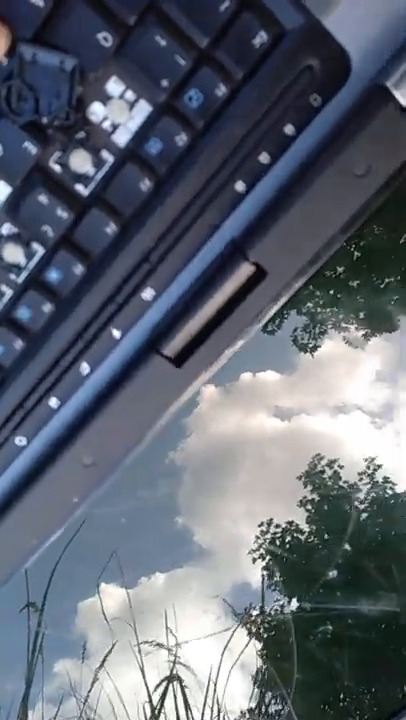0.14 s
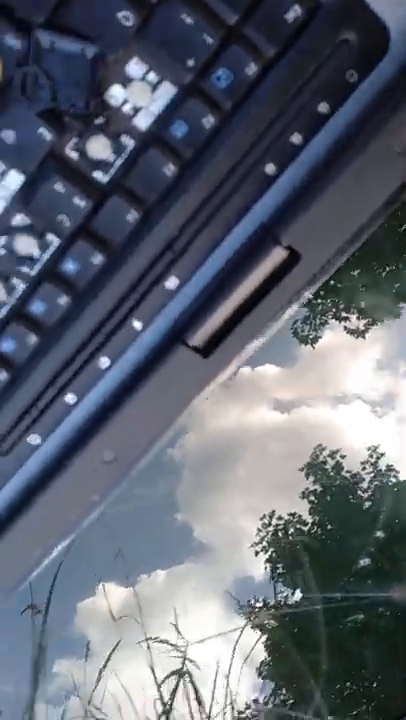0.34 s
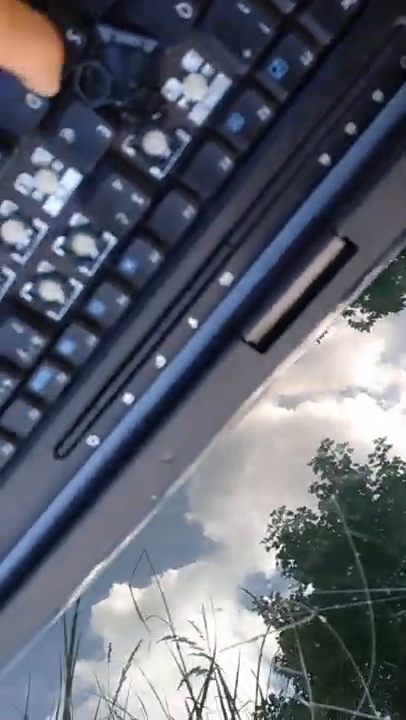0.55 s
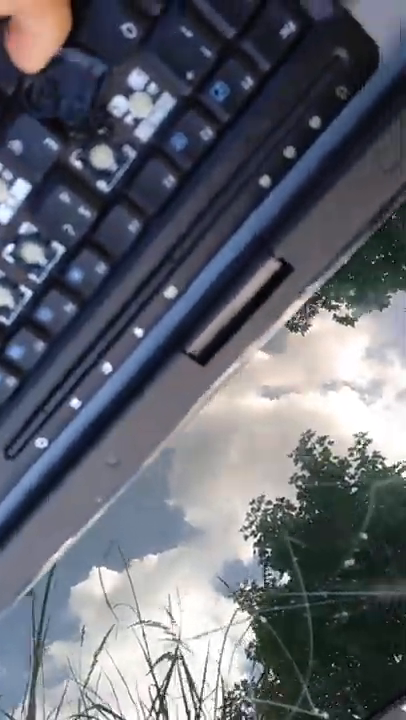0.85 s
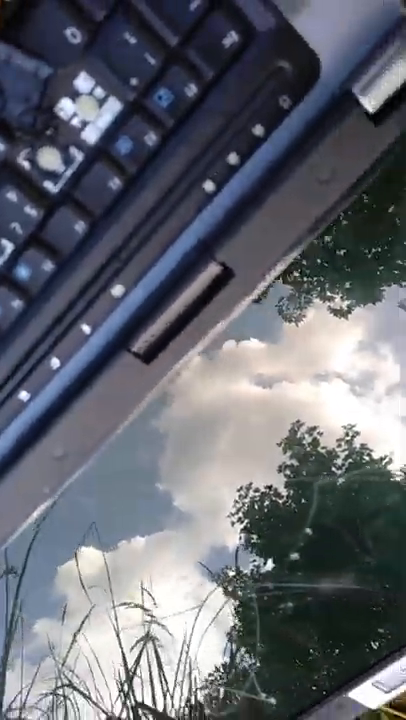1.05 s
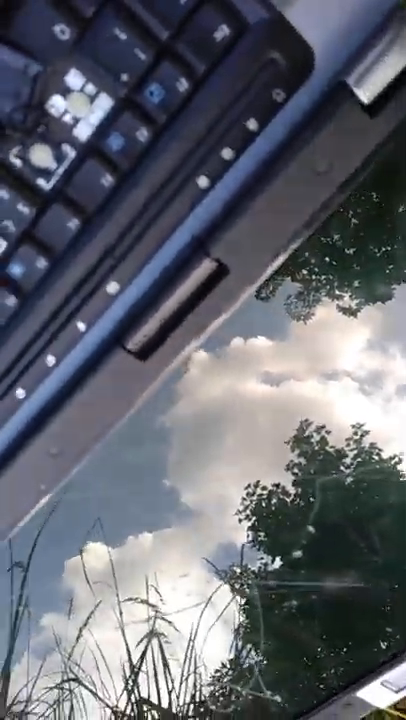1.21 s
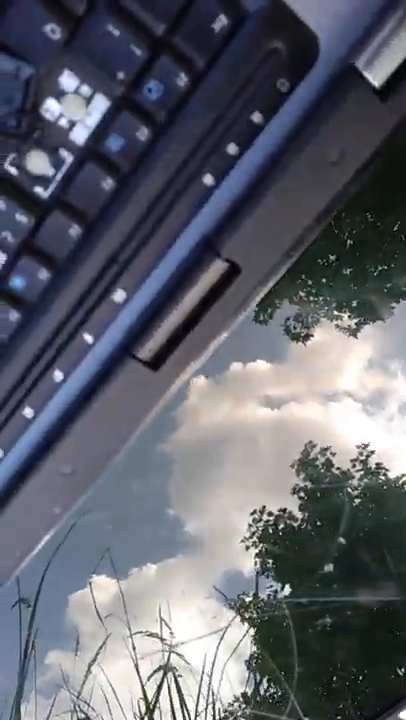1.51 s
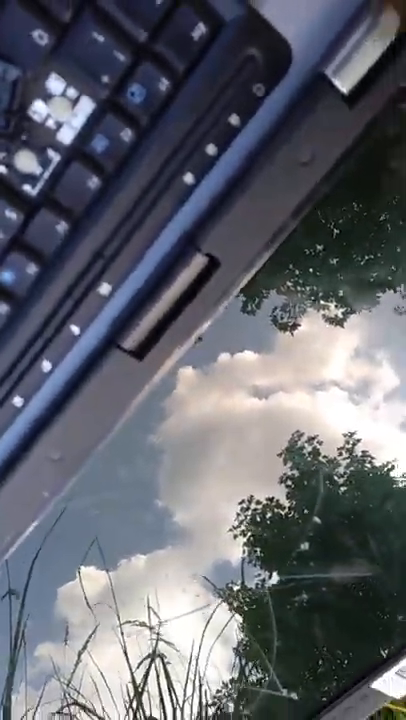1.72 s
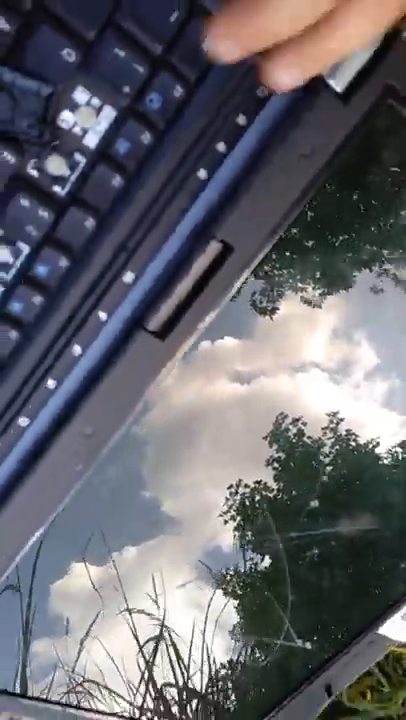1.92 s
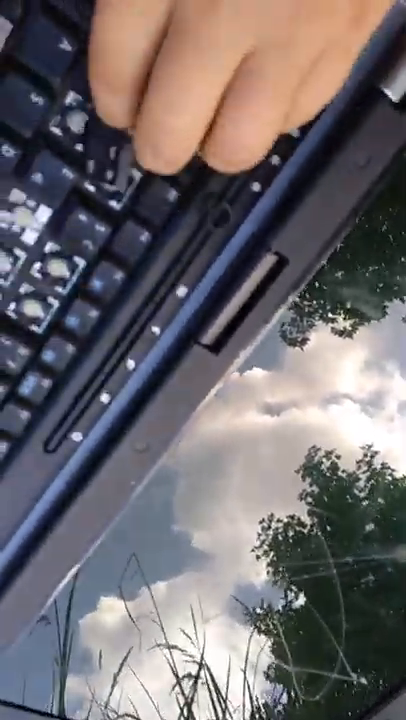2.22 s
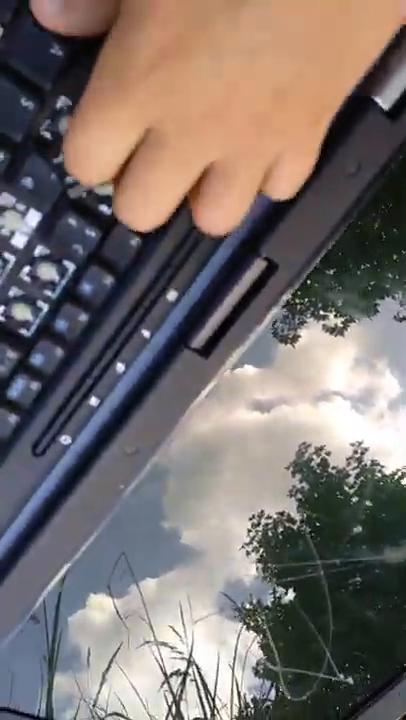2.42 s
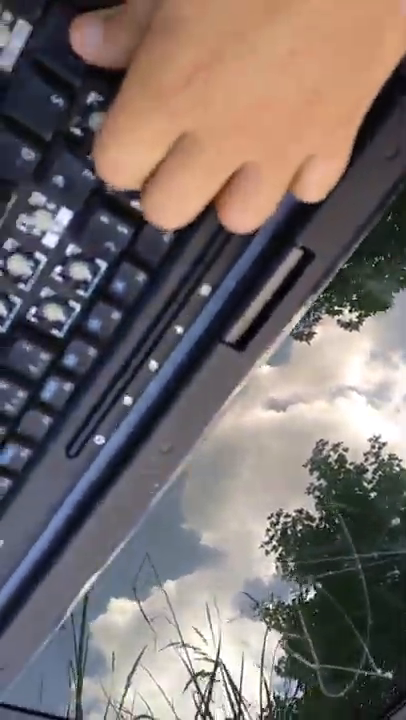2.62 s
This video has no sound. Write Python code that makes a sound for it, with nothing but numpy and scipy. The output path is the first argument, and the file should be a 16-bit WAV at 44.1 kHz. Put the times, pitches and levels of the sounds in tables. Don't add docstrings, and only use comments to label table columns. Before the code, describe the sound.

Plastic keycaps pried off a laptop keyboard, sharp irregular snaps and clicks, very close, outdoors

```python
import sys
import numpy as np
from scipy import signal
from scipy.fft import rfft, irfft, next_fast_len
from scipy.io import wavfile
from scipy.ndimage import uniform_filter1d, minimum_filter1d, map_coordinates

SR = 44100
rng = np.random.default_rng(int(sys.argv[2]) if len(sys.argv) > 2 else 0)


def gain_from_db(level_db):
    decades = np.asarray(level_db, float) / 20
    return 10 ** decades


def file_out(sig):
    cols = np.atleast_2d(sig).T
    lim = np.clip(cols, -1, 1)
    pcm = np.round(lim * 32767).astype(np.int16)
    wavfile.write(sys.argv[1], SR, pcm)


N = 121275
CLICK_T = np.arange(2048) / SR


def unit(x):
    return x / np.sqrt(np.mean(x ** 2, axis=-1, keepdims=True) + 1e-20)


def peak(x):
    return x / np.abs(x).max(axis=-1, keepdims=True)


def along(points, hz):
    f, v = np.transpose(points)
    return np.interp(np.log(hz + 1), np.log(f + 1), v)


def filtered(x, response):
    n = x.shape[-1]
    m = next_fast_len(n + 4096)
    return irfft(rfft(x, m) * response(np.fft.rfftfreq(m, 1 / SR)), m)[..., :n]


def high_pass(f, hz):
    return 1j * f / (hz + 1j * f)


def resonant(peaks):
    def response(f):
        total = 0
        for k, (centre, width, db) in enumerate(peaks):
            damping = 1j * f * width
            total = total + (-1) ** k * gain_from_db(db) * damping / (centre * centre - f * f + damping)
        return total
    return response


def ringing(modes, count, t):
    draw = rng.standard_normal((count, len(modes), 2))
    hz, db, t60 = np.transpose(modes)[..., None]
    decay = gain_from_db(db + 2.85 * draw[..., :1] - 60 * t / t60)
    tone = np.sin(2 * np.pi * hz * t * (1 + 0.0031 * draw[..., 1:]))
    return (decay * tone).sum(axis=1)


def wobble(rate):
    return map_coordinates(rng.standard_normal(int(N * rate / SR) + 4), [np.arange(N) * rate / SR])


def placed(times, rows):
    at = np.round(times * SR).astype(int)[:, None] + np.arange(rows.shape[1])
    return np.bincount(at.ravel(), rows.ravel(), N + SR)[:N]


def slips(count, t):
    slip_t60_s, rebound_s = .0095, .002
    rattle_db, rattle_t60_s = -25, 0.055
    back = rebound_s * (.5 + rng.random((count, 1)))

    def fall(u):
        return (u >= 0) * gain_from_db(-60 * np.abs(u) / slip_t60_s)

    noise = rng.standard_normal((count, len(t)))
    spiky = noise * np.sqrt(np.abs(noise))
    rattle = gain_from_db(rattle_db - 60 * t / rattle_t60_s)
    return spiky * (fall(t) + 0.44 * fall(t - back) + rattle) + 6 * (t == 0)


# (frequency [Hz], level [dB])
BRIGHT_COLOUR = [(3000, -6), (5000, -2), (7000, -1), (10000, 8.5), (13500, -1.5), (15800, -2.5)]
SNAP_LOW_HZ, TICK_LOW_HZ, FAINT_LOW_HZ = 2640, 5400, 5500


def clip_ring(count, t, low_hz=SNAP_LOW_HZ):
    clip_t60_s, modes = .004, 20
    draw = rng.random((count, modes, 3))
    hz = 4000 + 12200 * draw[..., :1]
    t60 = clip_t60_s * (.5 + draw[..., 2:])
    short = t[:512]
    decay = gain_from_db(along(BRIGHT_COLOUR, hz) + 10 * draw[..., 1:2] - 60 * short / t60)
    ring = (decay * np.sin(2 * np.pi * hz * short)).sum(axis=1)
    struck = signal.fftconvolve(slips(count, t), ring, axes=1)[:, :len(t)]
    return peak(filtered(struck, lambda f: high_pass(f, low_hz) ** 2))


# (frequency [Hz], width [Hz], level [dB])
CAP_TONES = [(1896, 680, -4), (2465, 440, 1.5), (3000, 1300, -5)]


def cap_tone(jolt):
    return peak(filtered(jolt, lambda f: resonant(CAP_TONES)(f) ** 2))


# (frequency [Hz], width [Hz], level [dB])
CASE_TONES = [(160, 750, -12.5), (450, 130, -.5), (745, 140, 0), (1134, 680, -5.5)]


def case_knock(jolt):
    return peak(filtered(jolt, lambda f: resonant(CASE_TONES)(f) * high_pass(f, 200) / (1 + 1j * f / 1500)))


# (time [s], peak level [dB], cap tone [dB], case knock [dB])
EARLY_SNAPS = [(0.5164, -27, -17, -3), (0.556, -21, -21, -20), (0.5636, -24, -16, -2),
               (0.679, -12.5, -18.5, -43), (0.9103, -30, -12, 1.5), (1.0272, -2, -39, -12.5),
               (1.0568, 0, -29, -23.5), (1.1837, -6, -29, -41), (1.2326, -6.5, -35, -26),
               (1.2492, -7, -41, -29), (1.2585, -10.5, -28, -17), (1.3817, -17, -18, -6),
               (1.3868, -9.5, -17, -12.5), (1.4919, -13, -21, -43), (1.5755, -17.5, -20, -8.5),
               (1.6227, -12, -23, -46), (1.6558, -18.5, -17.5, 1.5), (1.9693, -10, -24, -22),
               (1.9765, -12, -15, -9.5), (2.0053, -5.5, -31, -53), (2.011, -9.5, -31, -16)]
LATE_SNAPS = [(2.0357, 0, -31, -19), (2.0439, -2, -25, -36), (2.1157, -15.5, -25, -27),
              (2.1501, -19, -23, -6), (2.2268, 3.5, -22, -4.5), (2.2338, 1.5, -15, -26),
              (2.243, -22, -18, -25), (2.3776, -20.5, -6, 5), (2.4353, -12, -18, -11),
              (2.4976, 1.5, -30, -9), (2.591, -10.5, -9, -21), (2.5965, 3, -15.5, -8),
              (2.6609, -2.5, -38, -33), (2.7194, -6, -39, -0.5)]
# (time [s], peak level [dB])
EARLY_TICKS = [(0.021, -25.5), (0.0386, -26.5), (0.5014, -23), (0.7374, -26.5), (0.8114, -20.5),
               (1.022, -11), (1.05, -5), (1.1185, -29), (1.2652, -11.5), (1.2721, -20), (1.3289, -21.5),
               (1.41, -17), (1.4198, -13), (1.429, -11.5), (1.4563, -20), (1.5814, -10.5), (1.597, -28),
               (1.639, -44), (1.675, -19), (1.694, -18), (1.8118, -12.5), (1.8387, -13)]
LATE_TICKS = [(2.0399, -33), (2.042, -2.5), (2.0531, -5), (2.2868, -12), (2.2942, -5), (2.317, -7.5),
              (2.3291, -8), (2.3353, -8), (2.3461, -1.5), (2.3519, -2), (2.362, -27), (2.386, -5),
              (2.4062, -11), (2.4605, -20), (2.4837, -8), (2.492, -0.5), (2.5024, -3), (2.527, -18),
              (2.6505, -22), (2.6556, -17), (2.6904, -6)]
# (time [s], peak level [dB])
LEAD_SLIP = [
    (1.857, -16),
]


def snaps():
    snap_db, cap_gain_db, case_gain_db = -1, 2, -14.5
    tick_cap_db, tick_case_db = -28.5, -21
    full = EARLY_SNAPS + LATE_SNAPS
    ticks = [(s, db, tick_cap_db, tick_case_db) for s, db in EARLY_TICKS + LATE_TICKS + LEAD_SLIP]
    s, db, cap_db, case_db = np.transpose(full + ticks)[..., None]
    count = len(s)
    jolt = slips(count, CLICK_T)
    low_hz = np.where(np.arange(count) < len(full), SNAP_LOW_HZ, TICK_LOW_HZ)[:, None]
    sound = clip_ring(count, CLICK_T, low_hz)
    sound = sound + gain_from_db(cap_db + cap_gain_db) * cap_tone(jolt)
    sound = sound + gain_from_db(case_db + case_gain_db) * case_knock(jolt)
    return placed(s[:, 0], gain_from_db(db + snap_db) * sound)


# (time [s], peak level [dB], air push [dB])
FREE_POPS = [
    (0.1573, 0.5, -70),
    (0.2939, -2.5, -2),
    (1.512, -6, -55),
    (1.757, -4.5, -19.5),
    (1.8705, 1.5, -14),
]
# (frequency [Hz], level [dB], t60 [s])
FREE_CAP_MODES = [(4600, 30, 0.0007), (6680, 2.5, 0.0087), (9570, 18, 0.0046), (10200, -6.5, 0.01),
                  (11830, 7, 0.0049), (14000, 20, 0.0078)]


def pops():
    push_s = .00009
    s, db, push_db = np.transpose(FREE_POPS)[..., None]
    t, count = CLICK_T, len(s)
    push = np.exp(-((t - 3 * push_s) / push_s) ** 2)
    puff = rng.standard_normal((count, len(t))) * gain_from_db(-60 * t / 0.043)
    spray = .2 * clip_ring(count, t) + 0.052 * gain_from_db(push_db) * puff
    blow = peak(filtered(ringing(FREE_CAP_MODES, count, t), lambda f: high_pass(f, 3200) ** 4))
    return placed(s[:, 0], gain_from_db(db) * (blow + gain_from_db(push_db) * push + spray))


# (time [s], peak level [dB])
HOOK_BLOWS = [(0.7888, -25.5), (1.1284, -23), (1.1475, -29), (1.162, -4), (1.1964, -17.5), (1.2142, -7.5),
              (1.294, -43), (1.437, -20), (1.4493, -19.5), (1.4822, -23), (1.5529, -40), (1.6112, -12.5),
              (1.6644, -21), (2.307, -23), (2.5436, -17), (2.5872, 0)]
# (frequency [Hz], level [dB], t60 [s])
STEEL_MODES = [(5160, -20, .015), (6720, 0, .028), (8300, -15, .02), (13700, -2, .018)]
# (time [s], peak level [dB])
WIRE_BLOWS = [
    (2.2661, -14),
    (2.5587, -10.5),
    (2.5639, -10.5),
]
# (frequency [Hz], level [dB], t60 [s])
WIRE_MODES = [(8530, 17, 0.031), (11900, -25, .01)]


def hooks(hits, modes):
    hook_db, steel_share, cap_share = -3.5, .6, 0.039
    s, db = np.transpose(hits)[..., None]
    t, count = CLICK_T, len(s)
    sung = signal.fftconvolve(slips(count, t), ringing(modes, count, t), axes=1)
    steel = peak(sung[:, :len(t)])
    cap = cap_tone(slips(count, t))
    return placed(s[:, 0], gain_from_db(db + hook_db) * (steel_share * steel + clip_ring(count, t) + cap_share * cap))


# (time [s], peak level [dB])
SMALL_TICKS = [(0.076, -41), (0.0897, -40), (0.1431, -42), (0.3584, -31), (0.386, -33), (0.423, -39),
               (0.4476, -30), (0.457, -30), (0.536, -31), (0.646, -28), (0.6658, -22), (0.783, -23),
               (1.308, -28), (1.334, -26), (1.96, -25), (1.991, -19), (2.025, -40), (2.06, -32),
               (2.208, -23), (2.298, -15.5), (2.3385, -7), (2.37, -12)]
# (time [s], peak level [dB], frequency [Hz], t60 [s])
PART_RINGS = [(0.0897, -32.5, 6500, 0.0087), (0.1584, -11.5, 5540, 0.0053), (0.294, -4, 5200, 0.0052),
              (0.2941, -2, 11950, 0.0045), (0.409, -44.5, 770, 0.038), (0.493, -47, 3500, .01),
              (0.564, -27.5, 5040, 0.011), (0.568, -37, 778, 0.054), (0.91, -39.5, 2350, 0.033),
              (0.9103, -30.5, 5330, 0.016), (1.121, -27.5, 8900, 0.013), (1.185, -26, 5170, 0.026),
              (1.296, -29.5, 7240, 0.028), (1.7552, -9.5, 7700, 0.0049), (1.925, -43, 394, 0.037),
              (1.945, -42, 324, 0.037), (1.9695, -22.5, 3800, 0.014), (1.977, -24, 3450, 0.036),
              (1.977, -30, 1930, 0.052), (1.977, -14.5, 9400, 0.0085), (2.007, -23, 2910, 0.016),
              (2.0528, -6.5, 8950, 0.013), (2.151, -32.5, 980, .03), (2.187, -31, 3240, 0.0088),
              (2.317, -30, 8300, .04), (2.323, -28, 6720, .04), (2.34, -25.5, 3280, 0.016),
              (2.435, -28, 2950, 0.014), (2.497, -14.5, 2830, 0.016), (2.598, -25, 443, 0.056),
              (1.026, -10, 6300, 0.01), (1.058, -45, 114, 0.037), (1.412, -19, 14000, 0.029),
              (1.622, -29, 6900, 0.028), (1.663, -25, 13700, .02), (1.84, -42, 1020, 0.059),
              (2.035, -42, 90, 0.056), (2.042, -33, 6750, 0.053), (2.205, -47, 376, 0.021),
              (2.345, -29, 6700, 0.033), (2.469, -20, 7300, 0.014), (2.528, -29, 6720, 0.032)]


def small_parts():
    rise_s = 0.00034
    t = CLICK_T
    s, db = np.transpose(SMALL_TICKS)[..., None]
    ticks = clip_ring(len(s), t, FAINT_LOW_HZ)
    at, ring_db, hz, t60 = np.transpose(PART_RINGS)[..., None]
    shiver = np.cumsum(rng.standard_normal((len(at), len(t))), axis=1) * 0.038
    swell = gain_from_db(ring_db - 60 * t / t60) * (1 - np.exp(-t / rise_s))
    rings = swell * np.sin(2 * np.pi * hz * t + shiver)
    return placed(s[:, 0], gain_from_db(db) * ticks) + placed(at[:, 0], rings)


def grit():
    grains_per_s, spread_db, hiss_share = 3000, 3.2, 1.1
    size_db = np.minimum(spread_db * rng.exponential(size=N), 13)
    ticks = (rng.random(N) < grains_per_s / SR) * gain_from_db(size_db) * rng.uniform(-1.04, 1, N)
    return unit(ticks) + hiss_share * rng.standard_normal(N)


# (start [s], length [s], level [dB], dullness [dB])
NAIL_STROKES = [(0.293, 0.22, -54, -1.5), (0.533, 0.2, -40.5, 3), (0.604, 0.054, -36, 0.5),
                (1.13, 0.18, -56.5, 10.5), (1.269, 0.056, -45.5, 1.5), (1.323, 0.021, -40, -14),
                (1.965, 0.13, -51, 14), (1.367, 0.074, -36, -9), (1.469, 0.059, -36.5, -21),
                (1.542, 0.19, -46, -33), (1.926, 0.028, -57.5, 15), (2.07, 0.12, -38, -9.5),
                (2.221, 0.043, -24, 3.5), (2.236, 0.29, -41.5, -0.5), (2.451, 0.096, -33.5, 2),
                (2.576, 0.05, -19, 0), (2.593, 0.13, -46, 4.5)]
# (time [s], level [dB])
HAND_RUSTLE = [
    (0, -55.5),
    (.75, -59),
    (1.2, -44),
    (1.35, -51),
    (1.75, -46.5),
    (1.95, -52.5),
    (2.2, -41),
    (2.75, -27),
]


def scrapes(duck):
    uneven_db = 2.1
    t = np.arange(N) / SR
    strokes, dull_strokes = 0, 0
    for start, span, db, dull_db in NAIL_STROKES:
        stroke = np.sin(np.pi * np.clip((t - start) / span, 0, 1)) ** 2 * gain_from_db(db)
        strokes = strokes + stroke
        dull_strokes = dull_strokes + stroke * gain_from_db(dull_db - 8.0)
    s, rustle_db = np.transpose(HAND_RUSTLE)
    rustle = duck * gain_from_db(np.interp(t, s, rustle_db) - 1)
    uneven = gain_from_db(uneven_db * (wobble(70) + wobble(200)))

    bright = unit(filtered(grit(), lambda f: gain_from_db(along(BRIGHT_COLOUR, f))))
    steel = [(hz, np.log(1000) / (np.pi * t60), db) for hz, db, t60 in STEEL_MODES]
    singing = .55 * gain_from_db(2 * uneven_db * wobble(24.91)) * unit(filtered(grit() ** 3, resonant(steel)))
    bare = t > 1

    def body(f):
        return (resonant(CAP_TONES)(f) + 1.33 * resonant(CASE_TONES)(f)) * f ** 2 / (f ** 2 + 300 ** 2)

    dull = unit(filtered(grit(), body))
    dull_drive = gain_from_db(uneven_db * wobble(50)) * (dull_strokes + gain_from_db(-10.5) * rustle)
    return uneven * ((strokes + rustle) * bright + bare * strokes * singing + dull_drive * dull)


# (start [s], length [s], level [dB], centre [Hz])
SKIN_SLIDES = [
    (0.208, 0.082, -41.5, 7500),
    (0.335, 0.37, -58, 10600),
    (0.848, 0.33, -49.5, 8000),
]


def slides():
    t = np.arange(N) / SR
    total = 0
    for start, span, db, hz in SKIN_SLIDES:
        band = resonant([(hz, .35 * hz, 0)])
        hiss = unit(filtered(rng.standard_normal(N), lambda f: band(f) ** 2))
        swell = np.sin(np.pi * np.clip((t - start) / span, 0, 1) ** 1.17)
        total = total + gain_from_db(db) * swell * hiss
    return total


def ducking(loud):
    from_db, ratio, hold_s, release_s = -27, .85, .035, .03
    level_db = 10 * np.log10(np.abs(uniform_filter1d(loud ** 2, size=256)) + 1e-12)
    hold = round(hold_s * SR)
    need_db = np.pad(-ratio * np.maximum(level_db - from_db, 0), (hold // 2 + 150, 0))[:N]
    held_db = minimum_filter1d(need_db, hold)
    fade = np.exp(-1 / (release_s * SR))
    released_db = signal.lfilter([1 - fade], [1, -fade], held_db)
    return gain_from_db(uniform_filter1d(np.minimum(held_db, released_db), size=256))


# (frequency [Hz], level [dB per Hz])
AIR_COLOUR = [(18, -53), (30, 10.5), (194, 4), (449, 4.5), (760, 5), (1760, 4.5), (3870, -3), (9970, 2),
              (16000, -45)]
# (time [s], frequency [Hz])
ENGINE_HZ = [(0, 104.3), (.5, 95.3), (1.102, 98.8), (1.65, 112.2), (2.75, 109.2)]
# (multiple, level [dB])
ENGINE_HARMONICS = [(1, -72), (2, -69.5)]


def outdoors():
    air = unit(filtered(rng.standard_normal(N), lambda f: gain_from_db(along(AIR_COLOUR, f))))
    total = gain_from_db(-56.5 + 3.9 * wobble(7.0)) * air
    s, hz = np.transpose(ENGINE_HZ)
    pitch = np.interp(np.arange(N) / SR, s, hz) + 1.57 * wobble(10.0)
    turn = 2 * np.pi * np.cumsum(pitch) / SR
    for multiple, db in ENGINE_HARMONICS:
        total = total + np.sqrt(2) * gain_from_db(db + 2.8 * wobble(9.6)) * np.sin(multiple * turn)
    return total


def scene():
    clicks = snaps() + pops() + hooks(HOOK_BLOWS, STEEL_MODES) + hooks(WIRE_BLOWS, WIRE_MODES)
    duck = ducking(clicks)
    return (clicks + small_parts() + scrapes(duck) + slides() + duck * outdoors())[None]


def roll_off(x):
    return signal.sosfilt(signal.butter(12, 16830, fs=SR, output="sos"), x)


def record(dry):
    top_hz = 15950
    heard = filtered(np.clip(dry, -1, 1), lambda f: 1 / (1 + (f / top_hz) ** 80))
    return roll_off(heard)


dry = scene()
out = record(dry)
file_out(out)
```